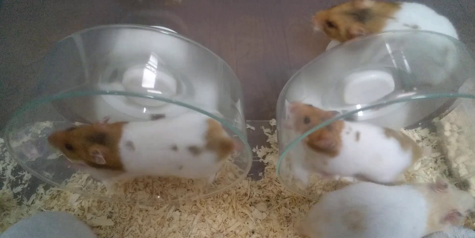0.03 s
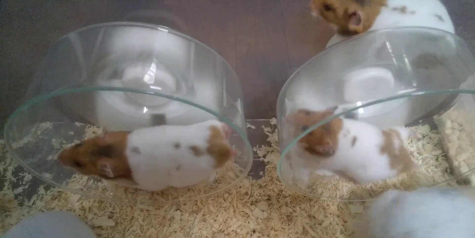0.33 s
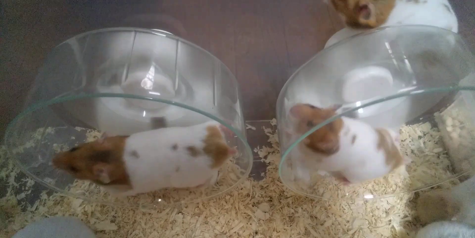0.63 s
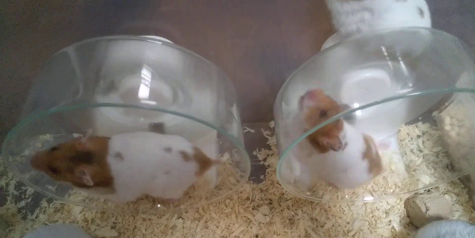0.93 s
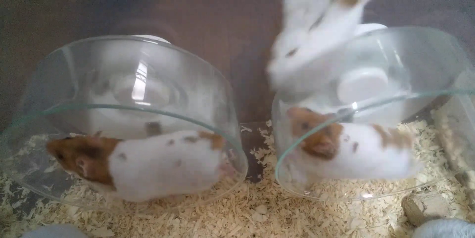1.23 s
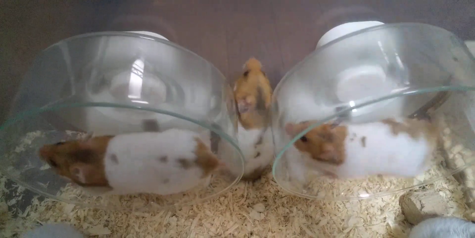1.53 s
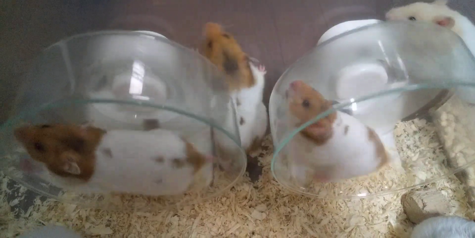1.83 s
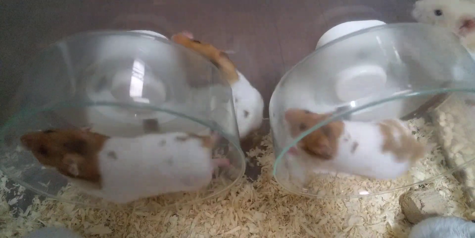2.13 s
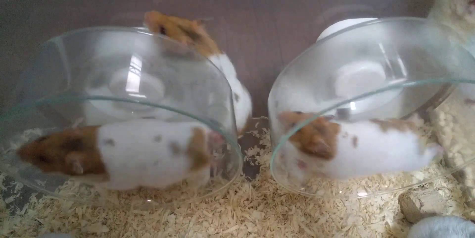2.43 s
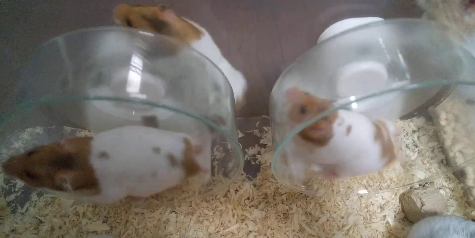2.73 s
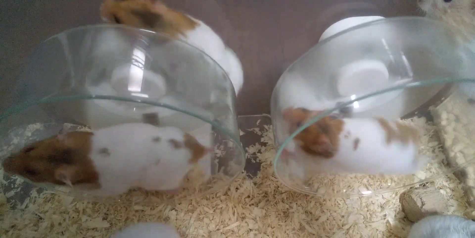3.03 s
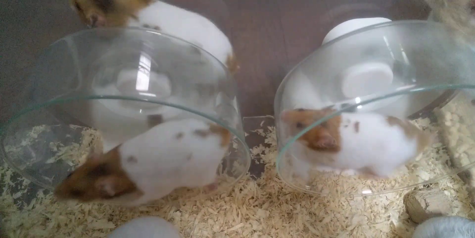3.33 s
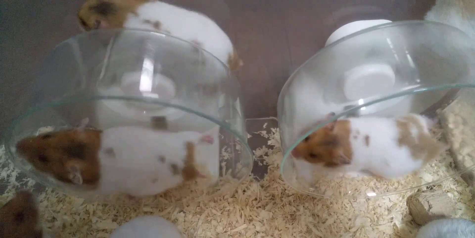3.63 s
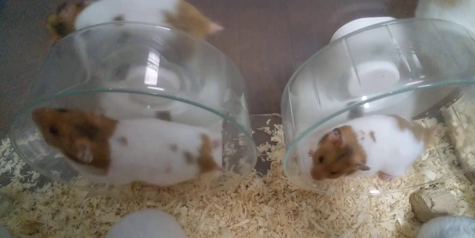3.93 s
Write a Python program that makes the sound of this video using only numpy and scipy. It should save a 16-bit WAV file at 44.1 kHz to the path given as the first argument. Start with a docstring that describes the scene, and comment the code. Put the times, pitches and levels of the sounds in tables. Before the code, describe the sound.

Hollow knocks of plastic hamster wheels, with light paw patter and rustling bedding, close up.

```python
"""Two plastic wheels knock, hum and rub as hamsters run in them, in a tank indoors, heard close up.
Paws patter on the treads, claws tick and friction excites the rolling shells.
A hamster squeezes between the wheels and climbs on one, which knocks on its axle and thumps the tank.
The bedding of wood shavings rustles over faint room noise."""
import sys
import numpy as np
from scipy import signal
from scipy.fft import rfft, irfft, next_fast_len
from scipy.io import wavfile
from scipy.ndimage import uniform_filter1d, map_coordinates

SR = 44100
rng = np.random.default_rng(int(sys.argv[2]) if len(sys.argv) > 2 else 0)


def int16_out(signal):
    """Quantize to a 16-bit WAV file."""
    q = np.round(np.clip(np.atleast_2d(signal).T, -1, 1) * 32767)
    wavfile.write(sys.argv[1], SR, q.astype(np.int16))


N = 176400

# tank floor modes (frequency [Hz], level [dB], t60 [s])
TANK_MODES = [(77.8, -23, 0.19), (163.7, -17.5, 0.055), (215.2, -11.5, 0.036), (330, -22, 0.027)]
# running shell resonances (frequency [Hz], width [Hz], level [dB])
SHELL_RESONANCES = [(566, 30, 5), (813, 87, 2.5), (946, 94, -1), (1330, 7.1, 5.5), (2228, 32, 5),
                    (3050, 69, 9.5), (3634, 36, -0.5)]
# scratch on plastic (frequency [Hz], level [dB])
SCRATCH_SPECTRUM = [(500, -8.5), (2000, 1), (4200, 5), (5500, -6.5), (7200, 2.5), (8500, -21), (13000, 2)]


def knocks():
    """A wheel scrapes, clacks and rings; its low modes and the tank follow a moment later."""
    # (time [s], ring [dB], thump [dB], contact cutoff [Hz], spot pitch [Hz], spot [dB], body lag [s])
    hits = [(0.222, -33.5, -17.5, 1170, 547, 0.5, 0.0017), (1.155, -21, -13.5, 2480, 930, -9, 0.0014),
            (1.2599, -10.5, -8.5, 790, 680, 2.5, .001), (1.555, -7.5, -1.5, 1080, 450, -24, 0.0013),
            (2.078, -20.5, -8.5, 890, 850, -15, 0.00042), (2.3387, 1.5, 1.5, 4950, 926, -8.5, 0.00191),
            (2.443, -9.5, -6, 1110, 555, -22, 0.00161), (2.666, -16.5, -14.5, 1780, 555, -10, 0.0017),
            (2.859, -11, -10.5, 1710, 1430, -6, 0.00183), (3.0872, 3, 1.5, 3100, 2300, -14.5, 0.0052),
            (3.378, 0, 1, 2000, 790, -8.5, 0.0024), (3.848, -9, -2.5, 2000, 1024, -12.5, 0.0018)]
    # (frequency [Hz], level [dB], t60 [s])
    wheel_modes = [(563, -14.5, 0.06), (667, -23.5, 0.049), (800, -8.5, 0.048), (903, -15.5, 0.037),
                   (1036, -21.5, 0.032), (1403, -28.5, 0.065), (1945, -23.5, 0.044), (2175, -32, 0.085),
                   (2271, -7.5, 0.03), (2435, -21.5, 0.047), (3068, -13.5, 0.04), (3790, -14, 0.014),
                   (4570, -16.5, 0.021)]
    # (frequency [Hz], level [dB])
    crack_spectrum = [(300, 10.5), (1000, 6), (3000, 0.5), (4500, 1.5), (8000, -6.5), (14000, 2)]
    body_below_hz, spot_t60_s, rise_s, scrape_lead_s = 1200, 0.02, 0.0015, 0.011
    out, t = np.zeros(N), np.arange(SR // 3) / SR
    for s, ring_db, thump_db, cutoff_hz, spot_hz, spot_db, lag_s in hits:
        modes = wheel_modes + [(spot_hz, spot_db, spot_t60_s)]
        onset = amp(ring_db) * (1 - np.exp(-t / rise_s))
        contact = lambda hz: 1 / (1 + 1j * hz / cutoff_hz) ** 2
        add(out, s - scrape_lead_s, amp(ring_db - 43) * burst(SCRATCH_SPECTRUM, t60_s=0.25))
        clack = ring([m for m in modes if m[0] > body_below_hz])
        crack = amp(-12.5) * burst(crack_spectrum, t60_s=0.039)
        add(out, s, onset * filtered(clack + crack, contact))
        body = ring([m for m in modes if m[0] <= body_below_hz])
        add(out, s + lag_s, onset * filtered(body, contact) + amp(thump_db) * ring(TANK_MODES))
    return out


def paws():
    """Dull patter on the treads; a few heavier, soft footfalls ring the tank floor."""
    # (time [s], level [dB])
    patter_levels = [(.12, -70), (.3, -53), (.55, -49), (.75, -52), (1, -45), (1.35, -38), (1.85, -45),
                     (2.2, -46), (2.5, -43.5), (3.2, -43.5), (3.5, -51), (3.72, -50.5), (4, -46)]
    # (frequency [Hz], level [dB])
    tread_spectrum = [(25, -25), (45, 7), (76, 2), (160, -5), (250, -15.5), (450, -31), (800, -22),
                      (1500, -41), (4000, -74)]
    # (time [s], gain [dB])
    footfalls = [(0.508, -17), (.89, -11.5), (0.942, -14), (1.043, -23), (1.203, -14.5), (1.305, -13),
                 (1.623, -28), (1.717, -10.5), (1.969, -10.5), (2.622, -10.5), (3.592, -14.5)]
    pad_cutoff_hz = 151
    out = level(patter_levels) * coloured(grains(per_s=130, spread_db=5), tread_spectrum)
    for s, db in footfalls:
        add(out, s, amp(db) * filtered(ring(TANK_MODES), lambda hz: 1 / (1 + 1j * hz / pad_cutoff_hz)))
    return out


def claws():
    """Each claw clicks, scratches briefly at its own pitch and rings the shell."""
    # (time [s], relative level [dB], pitch [Hz])
    ticks = [(0.203, -37.5, 12200), (0.312, -39, 3540), (0.436, -38.5, 3200), (0.891, -43, 3180),
             (1.147, -33, 3080), (1.260, -35, 3080), (1.303, -36, 6440), (1.323, -30, 3300),
             (1.36, -30, 12200), (1.384, -30.5, 3700), (1.396, -37, 5900), (1.49, -31, 2830),
             (1.576, -35.5, 3800), (1.604, -32, 4270), (1.715, -35, 2490), (1.744, -38.5, 3050),
             (1.776, -39.5, 4770), (1.955, -35, 3060), (2.002, -37.5, 2280), (2.242, -31, 2980),
             (2.284, -39.5, 3850), (2.433, -33, 3530), (2.46, -33.5, 3080), (2.662, -35, 4100),
             (2.701, -36, 3360), (2.754, -41, 3870), (3.188, -31, 4200), (3.267, -32, 5960),
             (3.39, -29.5, 4350), (3.488, -35.5, 2690), (3.597, -41, 3140)]
    rise_s, click_t60_s, scratch_t60_s, width_hz = 0.00052, 0.012, 0.045, 900
    out, t = np.zeros(N), np.arange(SR // 10) / SR
    decay = amp(3 - 60 * t / click_t60_s) + amp(-60 * t / scratch_t60_s)
    envelope = decay * (1 - np.exp(-t / rise_s))
    for s, db, hz in ticks:
        scratch = coloured(rng.standard_normal(len(t)) * envelope, SCRATCH_SPECTRUM)
        tone = unit(resonate(rng.standard_normal(len(t)) * envelope, [(hz, width_hz, 0)]))
        add(out, s, amp(db - 23.5) * (scratch + amp(1) * tone))
    return out + amp(2) * resonate(out, SHELL_RESONANCES)


def skids():
    """Paws slip on plastic: short squeaky bands of noise."""
    # (time [s], level [dB], pitch [Hz])
    slips = [(0.214, -45, 3970), (0.581, -44, 560), (1.448, -43, 1400), (1.466, -37.5, 950),
             (1.478, -35, 540), (1.662, -45, 980), (1.774, -48, 1010)]
    rise_s, width_ratio = 0.004, 0.11
    out, u = np.zeros(N), np.arange(SR // 10) / SR / rise_s
    for s, db, hz in slips:
        band = unit(resonate(rng.standard_normal(len(u)), [(hz, hz * width_ratio, 0)]))
        add(out, s, amp(db) * band * u * np.exp(1 - u))
    return out


def shell_hum():
    """Fine friction grains excite the turning shells."""
    # (time [s], level [dB])
    hum_levels = [(.12, -61.5), (.4, -66.5), (.55, -52), (.76, -63), (.86, -55), (1.25, -56), (1.8, -60.5),
                  (2.9, -58.5), (3.3, -54), (3.8, -68)]
    hum = unit(resonate(grains(per_s=1500, spread_db=6), SHELL_RESONANCES))
    return level(hum_levels) * hum * amp(4.3 * wobble(per_s=25.46))


def rim_rub():
    """The rim sticks and slips; as the contact wanders, its modes flicker and drift in pitch."""
    # (time [s], level [dB])
    rub_levels = [(2.33, -58), (2.37, -56), (2.5, -43), (2.62, -57.5), (2.7, -51.5), (2.9, -50), (3.4, -63),
                  (3.6, -88)]
    # (frequency [Hz], level [dB])
    rim_modes = [(1335, -3.5), (2185, -0.5), (3230, 4), (4055, -1), (4480, -3.5), (5090, -9), (5760, -5),
                 (6380, -7), (7110, -12.5)]
    width_hz, flicker_db, drift_ratio = 85, 3.5, 0.005
    slips = grains(per_s=260, spread_db=1)
    rasp = sum(amp(db + flicker_db * wobble(per_s=30.04)) * resonate(slips, [(hz, width_hz, 0)])
               for hz, db in rim_modes)
    speed = 1 + drift_ratio * wobble(per_s=10)
    return level(rub_levels) * unit(map_coordinates(rasp, [np.cumsum(speed)]))


def squeeze():
    """Fur and paws scrape between the wheels, which sound hollow."""
    # (time [s], level [dB])
    scrape_levels = [(1.24, -58), (1.275, -41), (1.42, -53), (1.48, -45), (1.55, -63)]
    # (frequency [Hz], width [Hz], level [dB])
    hollow_resonances = [(278, 46, 0.5), (556, 100, -0.5), (944, 120, -16)]
    return level(scrape_levels) * unit(resonate(grains(per_s=1500, spread_db=4.5), hollow_resonances))


def shavings():
    """Dry flakes crackle in small clumps, each with its own colour."""
    # (time [s], relative level [dB])
    rustle_levels = [(.16, -61), (.21, -56), (.55, -57.5), (.75, -61.5), (1, -55), (1.22, -57), (1.33, -46),
                     (1.53, -55), (1.85, -57), (2.1, -50.5), (2.3, -60), (2.45, -51.5), (2.8, -55.5),
                     (3.4, -53.5), (3.65, -56), (4, -56.5)]
    # (frequency [Hz], level [dB])
    flake_spectrum = [(300, 11.5), (1000, -11.5), (1800, 0.5), (4200, 5), (5500, -0.5), (7300, -1.5),
                      (8300, -12.5), (10500, -2), (12500, 0), (14200, 1)]
    patch_db, clump_db = 2.8, 2.4
    crackle = grains(per_s=2500, spread_db=2) + 0.28 * rng.standard_normal(N)
    spectra = signal.stft(crackle, nperseg=256)[2]
    patches = uniform_filter1d(rng.standard_normal(spectra.shape), size=5, axis=0)
    patches = unit(uniform_filter1d(patches, size=5, axis=1))
    flakes = signal.istft(spectra * amp(patch_db * patches), nperseg=256)[1][:N]
    clumps = amp(4 + clump_db * wobble(per_s=70))
    return level(rustle_levels) * clumps * coloured(flakes, flake_spectrum)


def room_tail(x):
    """Short reverberation; treble dies first."""
    # (frequency [Hz], t60 [s])
    decay_times = [(100, 0.45), (800, 0.25), (12000, 0.13)]
    hz, t, spectra = signal.stft(rng.standard_normal(SR // 2), SR, nperseg=256)
    decay = amp(-60 * t / along(decay_times, hz)[:, None])
    tail = signal.istft(spectra * decay, SR, nperseg=256)[1]
    return signal.fftconvolve(x, tail / np.linalg.norm(tail))[:N]


def room_noise():
    """Steady rumble with a thin hiss."""
    # (frequency [Hz], level [dB])
    air_spectrum = [(30, 7), (150, -3.5), (500, -38), (2000, -63), (6000, -23.5), (8500, -45), (14000, -15)]
    return coloured(rng.standard_normal(N), air_spectrum)


def ring(modes, scatter_db=2, detune_ratio=0.015, attack_cycles=0.89):
    """Struck modes, varied per hit; low ones build up more slowly."""
    t = np.arange(SR // 3) / SR
    out = np.zeros(len(t))
    for hz, db, t60_s in modes:
        decay = amp(db + rng.normal(0, scatter_db) - 60 * t / t60_s)
        attack = 1 - np.exp(-t * max(hz, 400) / attack_cycles)
        out += attack * decay * np.sin(2 * np.pi * hz * rng.normal(1, detune_ratio) * t)
    return out


def burst(spectrum, t60_s):
    """Decaying puff of noise."""
    t = np.arange(SR // 3) / SR
    return coloured(rng.standard_normal(len(t)), spectrum) * amp(-60 * t / t60_s)


def grains(per_s, spread_db):
    """Random tiny impacts of uneven size."""
    impulses = (rng.random(N) < per_s / SR) * rng.choice([-1, 1], N)
    return impulses * amp(spread_db * np.minimum(rng.exponential(size=N), 4))


def wobble(per_s):
    """Smooth curve through random knots."""
    knots = rng.standard_normal(int(N * per_s / SR) + 4)
    return map_coordinates(knots, [np.arange(N) * per_s / SR])


def resonate(x, peaks):
    """x through resonances (frequency [Hz], width [Hz], level [dB])."""
    return filtered(x, lambda f: sum(amp(db) * 1j * f * width / (hz * hz - f * f + 1j * f * width)
                                     for hz, width, db in peaks))


def coloured(x, spectrum):
    """x shaped by (frequency [Hz], level [dB]) points, at rms 1."""
    return unit(filtered(x, lambda hz: amp(along(spectrum, hz))))


def filtered(x, response):
    """x through a frequency response."""
    n = x.shape[-1]
    size = next_fast_len(n + SR // 4)
    return irfft(rfft(x, size) * response(np.fft.rfftfreq(size, 1 / SR)), size)[..., :n]


def along(points, hz):
    """Interpolate points on a log frequency axis."""
    knots_hz, values = np.transpose(points)
    return np.interp(np.log(hz + 1), np.log(knots_hz + 1), values)


def level(points):
    """Gain per sample from (time [s], level [dB]) points."""
    return amp(np.interp(np.arange(N) / SR, *np.transpose(points)))


def amp(db):
    """Decibels to gain."""
    return 10 ** (np.asarray(db) / 20)


def unit(x):
    """Scale to rms 1."""
    return x / np.sqrt(np.mean(x ** 2) + 1e-20)


def add(track, start_s, sound):
    """Mix a sound into a track."""
    part = track[round(start_s * SR):][:len(sound)]
    part += sound[:len(part)]


def scene():
    """Centred mix; only the treble of rustle and ticks spreads out."""
    # (frequency [Hz], gain [dB])
    side_response = [(3600, -54), (7000, -10.5), (10000, -5), (14000, -8)]
    near = knocks() + paws() + claws() + skids() + shell_hum() + rim_rub() + squeeze() + shavings()
    mid = near + amp(-16.5) * room_tail(near) + amp(-61) * room_noise()
    side = filtered(shavings() + claws(), lambda hz: amp(along(side_response, hz)))
    return np.array([mid + side, mid - side])


def record(dry):
    """Brief opening silence, low cut and steep band limit."""
    start_s, low_cut_hz, top_hz = 0.109, 42.5, 14350
    gated = dry * (np.arange(N) / SR > start_s)
    low_cut = signal.butter(5, low_cut_hz, "high", fs=SR, output="sos")
    return filtered(signal.sosfilt(low_cut, gated), lambda hz: 1 / (1 + (hz / top_hz) ** 200))


dry = scene()
out = record(dry)
int16_out(out)
```